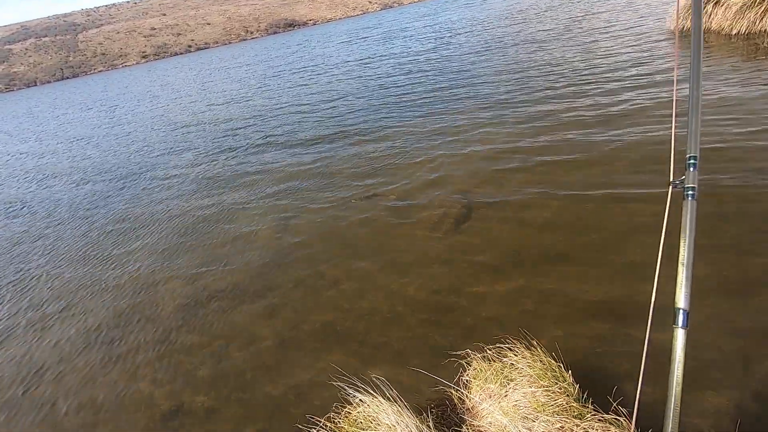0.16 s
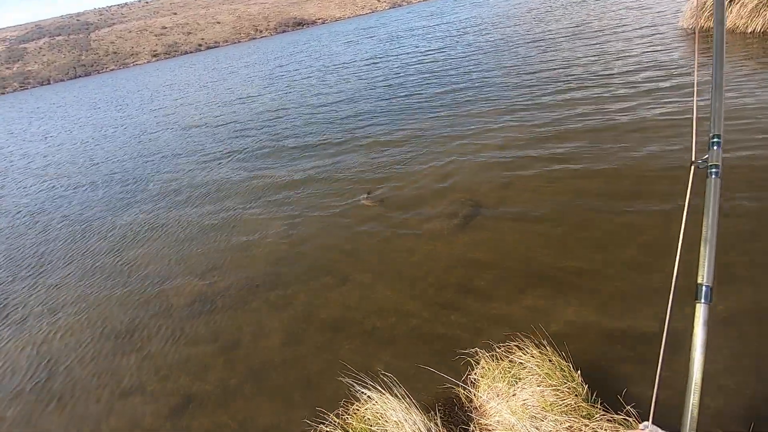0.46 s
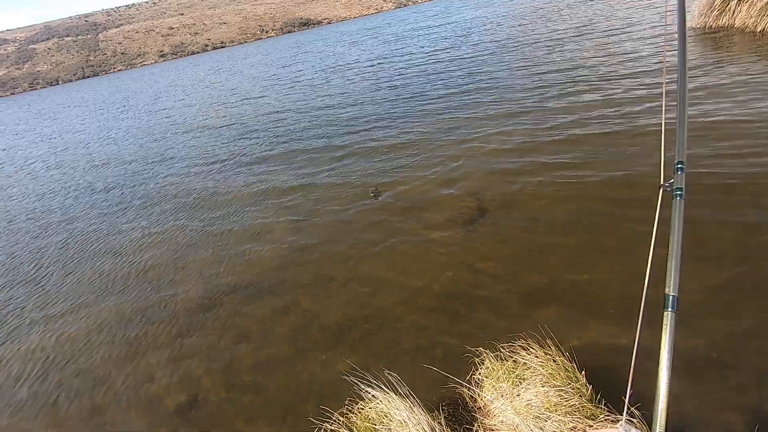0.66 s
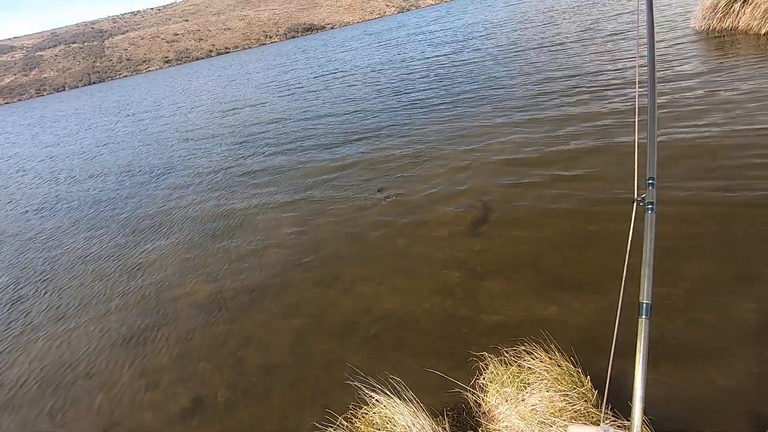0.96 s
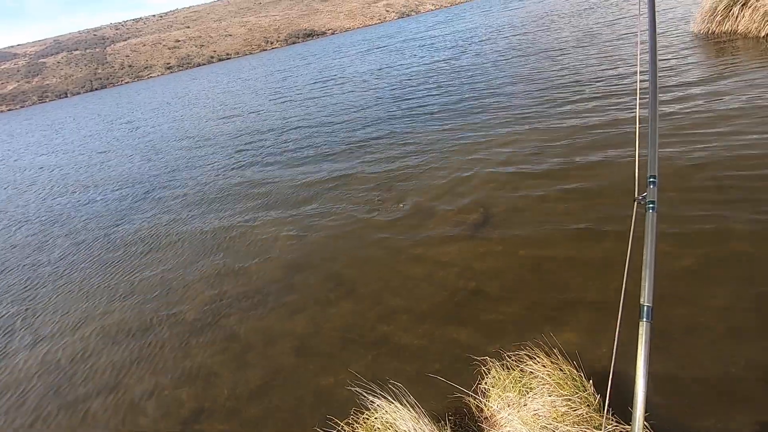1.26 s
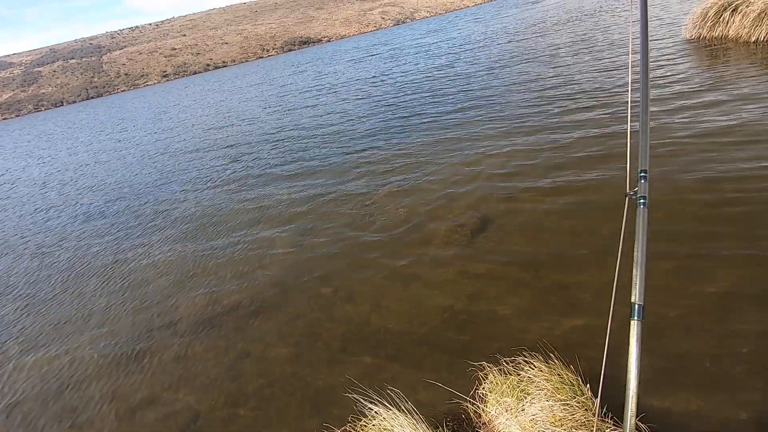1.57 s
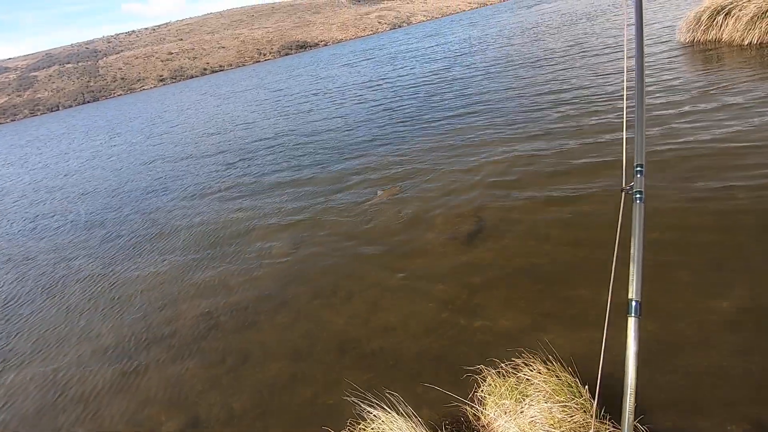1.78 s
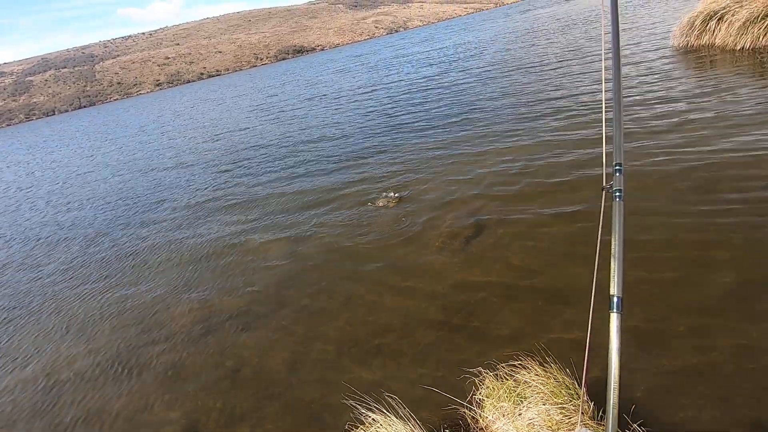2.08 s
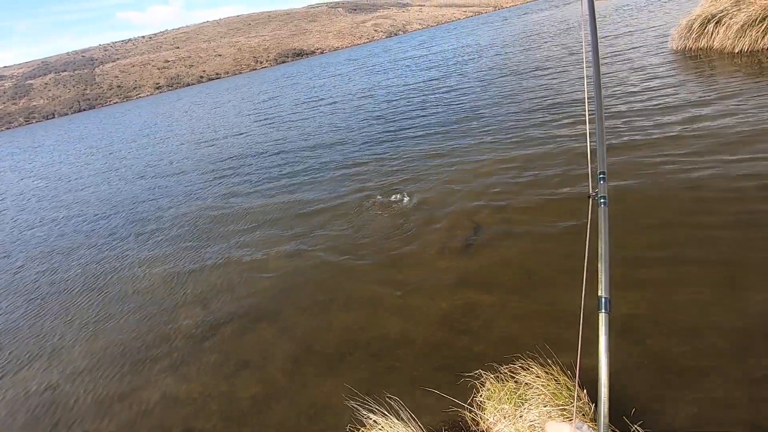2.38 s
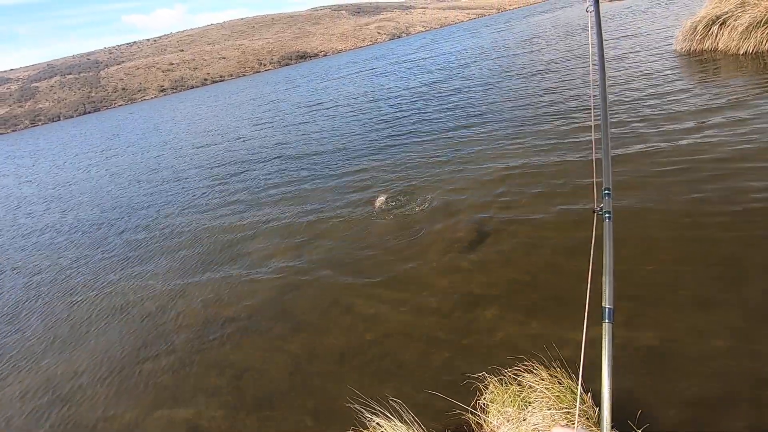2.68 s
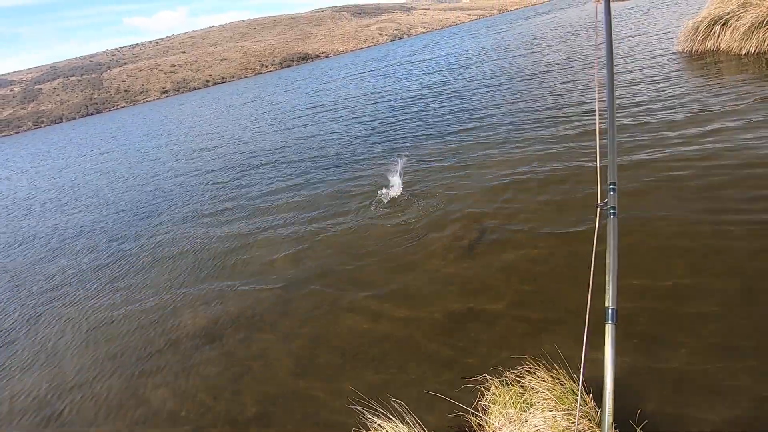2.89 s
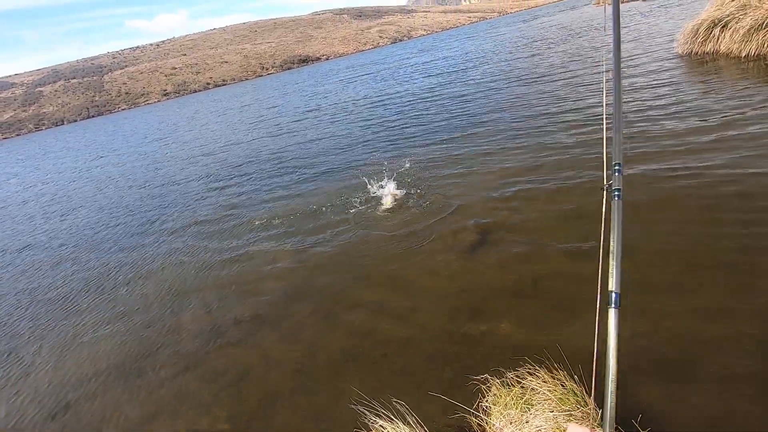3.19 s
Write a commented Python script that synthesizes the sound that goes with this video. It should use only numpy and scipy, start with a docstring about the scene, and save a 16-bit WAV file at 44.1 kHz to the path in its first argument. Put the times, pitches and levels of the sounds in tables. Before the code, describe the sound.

Fish splashing at a lake surface, light slaps growing into harder thrashing, over low wind rumble

```python
"""A lake in a light wind: a hooked fish stirs the surface, slaps it, then thrashes harder and harder.
Each splash is a cloud of ringing bubbles (decaying sines) and a crackle of spray (band-passed impacts).
Hollows gulp shut with rising notes, slaps are pressure pulses, smacks are noise snaps, and drops hiss.
Coloured noise and damped low swings make the rumble and buffets of wind on the microphone."""
import sys
import numpy as np
from scipy import signal
from scipy.fft import rfft, irfft, next_fast_len
from scipy.io import wavfile
from scipy.ndimage import uniform_filter1d

SR = 44100
rng = np.random.default_rng(int(sys.argv[2]) if len(sys.argv) > 2 else 0)


def master_out(mix):
    """Clip the mix to full scale and print it as 16-bit PCM to the path in sys.argv[1]."""
    frames = np.transpose(np.atleast_2d(mix))
    ceiling = np.clip(frames, -1, 1)
    pcm = np.round(ceiling * 32767).astype(np.int16)
    wavfile.write(sys.argv[1], SR, pcm)


N = 147294
TIME = np.arange(N) / SR  # s

# All levels and spectra below hold ahead of the microphone's response.
# wind rumble, strength in time: start_s, level_db
WIND_LEVEL = [(0, -41), (.17, -38), (.3, -41), (.62, -47), (.8, -40.5), (1.04, -45.5), (1.12, -34.5),
              (1.21, -38.5), (1.3, -34), (1.45, -40.5), (1.56, -36.5), (1.65, -43.5), (2.1, -38.5),
              (2.55, -45), (3.0, -45), (3.08, -33), (3.18, -38.5), (3.34, -35.5)]
# wind rumble, spectrum: frequency_hz, level_db
WIND_SPECTRUM = [(10, -17), (25, 3), (65, 3), (100, -6), (180, -7.5), (280, -20), (450, -23.5), (800, -42),
                 (1600, -72.5), (5000, -63.5)]
# sharp buffets of wind: start_s, pitch_hz, level_db, decay_cycles
WIND_BUFFETS = [(1.087, 193, -27, 2.1), (1.097, 92.5, -24.5, 3.3), (1.159, 188, -14, 0.78),
                (1.171, 344, -27.5, 2.04), (1.248, 92, -22, 2.45), (1.197, 270, -39.5, 1.77),
                (1.318, 85.5, -28, 3), (1.314, 453, -32, 2.1), (1.515, 419, -41.5, 2.9),
                (1.516, 215, -24.5, 1.18), (1.533, 78.2, -27, 2.2), (1.551, 223, -35, 1.5),
                (1.663, 73, -18, 0.72), (1.725, 139, -25.5, 2.04), (1.841, 90, -24.5, 1.27),
                (2.034, 66, -17, 0.49), (2.229, 54, -10.5, 0.38), (2.472, 65.6, -12, 0.31),
                (3.051, 62, -8, 0.49), (3.08, 172, -26.5, 1.43), (3.113, 131, -21.5, 1.5),
                (3.219, 150, -16.5, 1.15)]
# soft rush of air and ripples, strength in time: start_s, level_db
RUSH_LEVEL = [(0, -55.5), (.3, -55.5), (.6, -64), (1.0, -58), (1.3, -62.5), (1.8, -64.5), (3.34, -71)]
# soft rush, spectrum: frequency_hz, level_db
RUSH_SPECTRUM = [(100, -1), (350, 2), (700, -6.5), (1300, -18), (2500, -30.5), (8000, -35.5)]
# thin high sizzle as the surface is first stirred: start_s, level_db
SIZZLE_LEVEL = [(.97, -94), (1.015, -54.5), (1.05, -63), (1.09, -70.5), (1.2, -78), (1.38, -83),
                (1.45, -100)]
# hiss of fine falling drops, strength in time: start_s, level_db
FIZZ_LEVEL = [(0, -90), (1.96, -78), (2.0, -76), (2.2, -59.5), (2.45, -58.5), (2.6, -53), (2.75, -52.5),
              (2.9, -47.5), (3.05, -52.5), (3.2, -44), (3.34, -47)]
# hiss of fine drops, spectrum: frequency_hz, level_db
FIZZ_SPECTRUM = [(150, -7.5), (500, 3.5), (1000, -8), (2000, -3.5), (3500, -7), (5500, -10.5), (8000, -11),
                 (10000, -13.5), (12000, -21.5), (16000, -19.5)]
# finest spray, thrown by the hard blows: start_s, level_db
MIST_LEVEL = [(2.29, -100), (2.325, -52), (2.345, -76), (2.37, -45), (2.44, -93), (2.9, -72), (2.96, -59),
              (3.005, -43), (3.05, -47), (3.095, -41), (3.16, -54), (3.24, -49)]
# finest spray, spectrum: frequency_hz, level_db
MIST_SPECTRUM = [(5000, -45.5), (9500, -22), (12000, -1), (15000, 6)]
# hollows closing with a rising note: start_s, length_s, start_pitch_hz, end_pitch_hz, level_db
CLOSING_HOLLOWS = [(1.143, 0.042, 707, 1234, -57), (2.5, 0.057, 629, 1180, -49.5),
                   (2.643, 0.037, 499, 1114, -43), (2.895, 0.027, 556, 1155, -40.5),
                   (3.177, 0.04, 633, 1030, -41)]
# fins and drops breaking the surface: start_s, peak_db, centre_hz
SURFACE_SMACKS = [(.139, -62, 3600), (0.297, -59, 4700), (.373, -43, 5360), (.55, -60, 4100),
                  (.924, -53, 1110), (.967, -47.5, 4460), (1.014, -41, 7100), (1.034, -43.5, 3600),
                  (1.053, -42.5, 5030), (1.145, -53, 6000), (1.979, -44, 2970), (1.983, -39, 2500),
                  (2.04, -39, 6000), (2.079, -43, 1140), (2.104, -41, 1180), (2.116, -34.5, 2220),
                  (2.211, -39.5, 1980), (2.293, -43, 1300), (2.325, -48, 4130), (2.3601, -29.5, 4650),
                  (2.401, -29.5, 690), (2.435, -36.5, 1900), (2.497, -34, 2280), (2.599, -38.5, 1970),
                  (2.683, -32, 4700), (2.7789, -37, 1970), (2.801, -42, 860), (2.836, -33.5, 1710),
                  (2.871, -37, 1790), (2.956, -23.5, 3650), (2.9635, -23, 3300), (2.965, -38, 1520),
                  (3.0865, -24.5, 3020), (3.099, -23.5, 2020), (3.268, -29, 3500), (3.276, -33, 3580),
                  (3.297, -33, 2400)]
# single large bubbles and drops: start_s, pitch_hz, level_db, decay_s, pitch_change_per_decay (fraction)
LARGE_BUBBLES = [(0.374, 3060, -48, 0.0019, 0.07), (.903, 1807, -59.5, 0.0094, -0.011),
                 (.941, 2340, -45.5, 0.0029, -0.037), (0.956, 1580, -52, 0.011, 0.036),
                 (1.033, 2040, -41, 0.0054, -0.025), (1.053, 637, -48, 0.025, -0.034),
                 (1.058, 3470, -49.5, .003, 0.069), (1.414, 3600, -58.5, 0.0031, 0.24),
                 (1.953, 3300, -55.5, 0.0042, 0.018), (1.9939, 823, -25, 0.0026, 0),
                 (1.9925, 448, -24.5, 0.0054, -0.011), (2.081, 1700, -32, 0.0023, 0.021),
                 (2.127, 928, -42.5, 0.004, 0.049), (2.274, 2460, -36, 0.0026, -0.011),
                 (2.291, 987, -30.5, 0.0018, 0.098), (2.341, 2820, -30, 0.0013, 0.022),
                 (2.3606, 2283, -24, 0.0034, -0.092), (2.362, 394, -33, 0.0072, 0.22),
                 (2.377, 1690, -29.5, 0.0021, -0.0014), (2.402, 202.6, -33.5, 0.032, 0.083),
                 (2.435, 2010, -30, 0.0025, -0.014), (2.554, 2690, -37.5, 0.0019, 0.16),
                 (2.66, 197, -34, 0.013, 0.31), (2.688, 3150, -35.5, 0.0051, 0.037),
                 (2.872, 2700, -38, 0.0035, -0.054), (2.8, 522, -36.5, 0.0109, 0.09),
                 (2.9, 3710, -30.5, 0.0045, 0.017), (2.963, 693, -25.5, 0.0033, -0.11),
                 (2.974, 3040, -24, 0.0016, 0.053), (3.08, 930, -41, 0.0069, -0.17),
                 (3.0851, 1170, -32, 0.0046, 0.0059), (3.122, 1650, -25, 0.0019, -0.0044),
                 (3.209, 771, -33.5, 0.028, -0.032), (3.211, 3600, -18, 0.0018, -0.041),
                 (3.216, 473, -28, 0.021, -0.092), (3.236, 677, -29, 0.017, 0.3),
                 (3.244, 850, -29, 0.012, 0.037), (3.276, 966, -29, 0.0035, 0.14),
                 (3.276, 3900, -21.5, 0.00094, 0.02)]
# hard slaps of the tail: centre_s, peak_db, centre_to_peak_s
TAIL_SLAPS = [(1.9951, -25, 0.0003), (1.9965, -18, 0.000077), (3.2242, -41, 0.00037),
              (3.235, -26.5, 0.00087)]
# splashes: peak_s, rise_s, fall_s, bubbles_db, middle_pitch_hz, spray_db
SPLASH_EVENTS = [(0.407, 0.026, 0.048, -71.5, 2510, -63.5), (0.949, 0.015, 0.027, -66, 2010, -68),
                 (1.035, 0.022, 0.016, -56, 2730, -54), (1.1, 0.03, 0.057, -62, 1487, -63.5),
                 (1.988, 0.0032, 0.016, -44.5, 2063, -47), (2.016, .008, 0.013, -47, 1105, -66),
                 (2.084, 0.0012, 0.0051, -49.5, 1510, -72), (2.12, 0.0072, 0.016, -42, 1031, -78),
                 (2.215, 0.0032, 0.023, -45.5, 1304, -82), (2.293, 0.0024, 0.015, -48.5, 1170, -72),
                 (2.324, 0.0031, 0.0056, -41, 1917, -42.5), (2.341, 0.00083, 0.0075, -44, 1240, -58),
                 (2.37, 0.004, 0.015, -46, 1934, -41.5), (2.405, 0.0027, 0.0059, -54, 923, -55),
                 (2.501, 0.0031, 0.012, -52, 2250, -76), (2.55, 0.011, 0.0092, -48, 1630, -78),
                 (2.69, 0.0078, 0.01, -45, 3580, -49.5), (2.78, 0.0017, 0.005, -68, 1670, -44.5),
                 (2.84, 0.0067, 0.012, -49, 1760, -45), (2.873, 0.0016, 0.0029, -54, 1770, -40),
                 (2.902, 0.0048, 0.0065, -45.5, 1980, -38.5), (2.964, 0.0044, 0.01, -38.5, 1630, -44),
                 (3.004, 0.024, 0.032, -66, 1660, -36), (3.098, 0.015, 0.015, -36, 1300, -32),
                 (3.18, 0.02, 0.024, -42, 1034, -51), (3.21, 0.002, 0.0053, -31, 1570, -33),
                 (3.231, 0.0064, .015, -33, 526, -39), (3.274, 0.0087, 0.0067, -35.5, 1590, -33),
                 (3.299, 0.0034, 0.0079, -59, 2070, -31.5), (3.338, 0.009, 0.021, -41.5, 1520, -38)]
# spray of the splashes, spectrum: frequency_hz, level_db
SPRAY_SPECTRUM = [(200, -17), (600, 1), (1500, -3), (3400, -2.5), (5500, -0.5), (8000, -5), (12000, -19),
                  (16000, 9)]
# microphone response: frequency_hz, gain_db
MICROPHONE_RESPONSE = [(1000, 1), (2700, -1), (3600, 1), (4200, -3.5), (4900, -9.5), (6200, -12),
                       (7700, -6), (8800, -11.5), (10000, -20.5), (11200, -23), (12500, -21), (15500, -50)]

FLOOR_DB, CUTOFF_HZ = -75.5, 15600
WIND_EVEN_S = 0.04  # averaging window that evens the rumble's strength
BUBBLE_ATTACK_CYCLES = 0.18  # time constant of a bubble's onset
BUBBLE_SPREAD_OCT, BUBBLE_SPREAD_DB = 0.736, 8.5  # standard deviations before clipping
RING_CYCLES = 6.4  # typical decay time of a bubble in a splash or drip
BUBBLE_RISE = 0.06  # scale of the random pitch change per decay time, as a fraction
TICK_SPREAD_OCT, TICK_CYCLES = 0.35, 3.0
# the levels of these three clouds state total energy
RIPPLE_TICK_DB, RIPPLE_TICK_HZ = -84, 3900
DRIP_START_S, DRIP_DB, DRIP_HZ = 1.99, -63, 1918
TICK_DB, TICK_HZ = -65, 6360
SIZZLE_HZ, SIZZLE_HALF_WIDTH_OCT = 8080, 0.19
GULP_ROUGHNESS, GULP_FLUTTER_HZ = 0.28, 118  # depth as a fraction, fastest wobble
SMACK_DECAY_S, SMACK_HALF_WIDTH_OCT = 0.002, 0.18
MERGE_S, WASH_HALF_WIDTH_OCT = 0.036, 0.57  # in splashes longer than this most bubbles merge into a wash
SPRAY_GRAINS_PER_S, SPRAY_SPREAD_DB = 24000, 5.0  # nominal rate, mean excess of impact strength
SPRAY_CLUMP_DB, SPRAY_CLUMP_HZ = 1.5, 223  # depth and fastest rate of the spray's unevenness


def from_db(db):
    """Logarithmic level: decibels become an amplitude ratio."""
    return 10 ** (np.asarray(db) / 20)


def rms_one(x):
    """Normalization: scale to unit root-mean-square."""
    return x / np.sqrt(np.mean(x ** 2) + 1e-20)


def level(rows):
    """Amplitude envelope: gain in time, interpolated in decibels."""
    return from_db(np.interp(TIME, *np.transpose(rows)))


def band_pass(x, edges, order):
    """Resonant selection: keep the band between two frequencies."""
    return signal.sosfilt(signal.butter(order, edges, "band", fs=SR, output="sos"), x)


def band_edges(hz, half_width_oct):
    """Logarithmic pitch: edges equally many octaves below and above a centre."""
    return hz * 2. ** (half_width_oct * np.array([-1, 1]))


def colour(x, points):
    """Minimum-phase filtering: the folded cepstrum gives a causal response through the given points."""
    size = 2 * next_fast_len(N)
    hz, db = np.transpose(points)
    grid_hz = np.arange(size // 2 + 1) * SR / size
    grid_db = np.interp(np.log(grid_hz + 1), np.log(hz), db)
    cepstrum = irfft(np.log(from_db(grid_db)))
    cepstrum[1:size // 2] *= 2
    cepstrum[size // 2 + 1:] = 0
    return irfft(rfft(x, size) * np.exp(rfft(cepstrum)))[:N]


def noise(points):
    """Spectral shaping: coloured random noise of unit rms."""
    return rms_one(colour(rng.standard_normal(N), points))


def flutter(hz):
    """Random modulation: low-passed noise of unit rms."""
    return rms_one(signal.sosfilt(signal.butter(2, hz, fs=SR, output="sos"), rng.standard_normal(N)))


def add(out, s, sound):
    """Superposition: mix a sound in at time s."""
    i = max(int(s * SR), 0)
    if i < N:
        out[i:i + len(sound)] += sound[:N - i]


def bubble(hz, decay, rise):
    """Damped oscillation: a dying sine whose pitch slides as it rings."""
    age = np.arange(int(6 * decay * SR) + 2) / SR
    envelope = np.exp(-age / decay) * (1 - np.exp(-age * hz / BUBBLE_ATTACK_CYCLES))
    return envelope * np.sin(2 * np.pi * hz * age * (1 + .5 * rise * age / decay))


def cloud(times, middle_hz, spread_oct, cycles):
    """Random superposition: bubbles of varied size, strength, damping and glide; total energy 1."""
    out = np.zeros(N)
    draws = np.clip(rng.standard_normal((len(times), 4)), -1.8, 1.8)
    for s, (size, strength, damping, glide) in zip(times, draws):
        hz = min(middle_hz * 2 ** (spread_oct * size), SR / 3)
        gain = from_db(BUBBLE_SPREAD_DB * strength) * (hz / middle_hz) ** 0.063
        decay = cycles / hz * np.exp(.4 * damping)
        add(out, s, gain * bubble(hz, decay, BUBBLE_RISE * (.5 + glide)))
    return out / np.sqrt(np.sum(out ** 2) / SR + 1e-20)


def crackle(per_s, spread_db, points, count=40):
    """Impulse excitation: dense drop impacts ring in narrow bands, high ones commoner; unit rms."""
    out, edges = np.zeros(N), np.geomspace(200, 16000, count + 1)
    strengths = from_db(spread_db * np.minimum(rng.exponential(1, N), 4))
    impacts = strengths * rng.choice([-1, 1], N)
    shares = np.sqrt(edges) / np.sqrt(edges).sum()
    for low, high, share in zip(edges, edges[1:], shares):
        hits = rms_one(impacts * (rng.random(N) < per_s * share / SR))
        out += band_pass(hits + 1e-18, [low, high], 1)
    return rms_one(colour(out, points))


def wind():
    """Turbulent pressure: rumble and damped buffets on the microphone over a soft rush."""
    rumble = noise(WIND_SPECTRUM)
    rumble = rumble / np.sqrt(uniform_filter1d(rumble ** 2, int(WIND_EVEN_S * SR)) + 1e-9)
    out = level(WIND_LEVEL) * rumble + level(RUSH_LEVEL) * noise(RUSH_SPECTRUM)
    for s, hz, db, cycles in WIND_BUFFETS:
        swing = bubble(hz, cycles / hz, 0)
        soft_onset = np.tanh(2.0 * hz * TIME[:len(swing)]) ** 2
        add(out, s, from_db(db) * swing * soft_onset)
    return out


def ripples(count=90):
    """Bubble resonance: tiny bubbles burst faintly at random throughout."""
    times = rng.uniform(0, N / SR, count)
    return from_db(RIPPLE_TICK_DB) * cloud(times, RIPPLE_TICK_HZ, TICK_SPREAD_OCT, TICK_CYCLES)


def sizzle():
    """Band-limited noise: a thin high hiss."""
    edges = band_edges(SIZZLE_HZ, SIZZLE_HALF_WIDTH_OCT)
    return level(SIZZLE_LEVEL) * rms_one(band_pass(rng.standard_normal(N), edges, 2))


def falling_drops(count=170):
    """Random impacts: thrown water patters back as drips, ticks, a growing hiss and fine mist."""
    drip_times = rng.uniform(DRIP_START_S, N / SR, count)
    drips = from_db(DRIP_DB) * cloud(drip_times, DRIP_HZ, BUBBLE_SPREAD_OCT, RING_CYCLES)
    tick_times = rng.uniform(DRIP_START_S, N / SR, 2 * count)
    ticks = from_db(TICK_DB) * cloud(tick_times, TICK_HZ, TICK_SPREAD_OCT, TICK_CYCLES)
    mist = level(MIST_LEVEL) * crackle(per_s=20000, spread_db=6.0, points=MIST_SPECTRUM)
    fizz = level(FIZZ_LEVEL) * crackle(per_s=25000, spread_db=3.0, points=FIZZ_SPECTRUM)
    return drips + ticks + mist + fizz


def gulps():
    """Cavity resonance: a shrinking hollow sings a rough upward glide."""
    out = np.zeros(N)
    for s, length, start_hz, end_hz, db in CLOSING_HOLLOWS:
        u = np.arange(0, 1, 1 / (length * SR))  # fraction of the gulp elapsed
        phase = 2 * np.pi * np.cumsum(start_hz * (end_hz / start_hz) ** u) / SR
        roughness = 1 + GULP_ROUGHNESS * flutter(GULP_FLUTTER_HZ)[-len(u):]
        add(out, s, from_db(db) * np.sin(np.pi * u) * roughness * np.sin(phase))
    return out


def plops():
    """Bubble resonance: large bubbles and drops ring out on their own."""
    out = np.zeros(N)
    for s, hz, db, decay, rise in LARGE_BUBBLES:
        add(out, s, from_db(db) * bubble(hz, decay, rise))
    return out


def smacks():
    """Transient contact: breaking the surface gives a brief snap of noise that starts at once."""
    out, age = np.zeros(N), TIME[:SR // 50]
    for s, db, hz in SURFACE_SMACKS:
        edges = np.minimum(band_edges(hz, SMACK_HALF_WIDTH_OCT), [np.inf, SR / np.e])
        burst = rng.standard_normal(len(age)) * np.exp(-age / SMACK_DECAY_S)
        snap = band_pass(burst, edges, 1)
        add(out, s, from_db(db) * snap / np.abs(snap).max())
    return out


def slaps():
    """Impulsive pressure: the tail hits flat, one push and one pull."""
    out = np.zeros(N)
    for s, db, width in TAIL_SLAPS:
        u = np.arange(-5, 5, 1 / (width * SR))
        add(out, s - len(u) / 2 / SR, -from_db(db) * u * np.exp((1 - u * u) / 2))
    return out


def splashes(count=64):
    """Common envelope: each splash sheds bubbles, a wash of merged bubbles and spray at one pace."""
    out, spray_power = np.zeros(N), np.zeros(N)
    for s, rise, fall, bubbles_db, hz, spray_db in SPLASH_EVENTS:
        # Gaussian swell, exponential fall
        exponent = np.where(TIME < s, .5 * ((TIME - s) / rise) ** 2, (TIME - s) / fall)
        pace = np.exp(-np.minimum(exponent, 50))
        # bubbles are densest where the pace is greatest
        turns = (np.arange(count) + rng.random(count)) / count
        times = np.searchsorted(np.cumsum(pace), turns * pace.sum()) / SR
        bubbles = np.sqrt(pace.sum() / SR) * cloud(times, hz, BUBBLE_SPREAD_OCT, RING_CYCLES)
        edges = band_edges(hz, WASH_HALF_WIDTH_OCT)
        wash = rms_one(band_pass(rng.standard_normal(N), edges, 2))
        clear = 1 / (1 + ((rise + fall) / MERGE_S) ** 2)  # power share of distinct bubbles
        mixture = np.sqrt(clear) * bubbles + np.sqrt((1 - clear) * pace) * wash
        out += from_db(bubbles_db) * mixture
        spray_power += from_db(spray_db) ** 2 * pace
    clumps = rms_one(from_db(SPRAY_CLUMP_DB * np.clip(flutter(SPRAY_CLUMP_HZ), -2, 2)))
    spray = crackle(SPRAY_GRAINS_PER_S, SPRAY_SPREAD_DB, SPRAY_SPECTRUM)
    return out + np.sqrt(spray_power) * clumps * spray


def scene():
    """Superposition: wind, ripples and a faint even hiss under the fish."""
    background = wind() + ripples() + from_db(FLOOR_DB) * rng.standard_normal(N)
    fish = sizzle() + falling_drops() + gulps() + plops() + smacks() + slaps() + splashes()
    return (background + fish)[None]


def record(dry):
    """Linear filtering: a microphone with uneven treble, then a steep low-pass."""
    heard = colour(dry[0], MICROPHONE_RESPONSE)
    return signal.sosfilt(signal.ellip(10, .2, 80, CUTOFF_HZ, fs=SR, output="sos"), heard)[None]


dry = scene()
out = record(dry)
master_out(out)
```